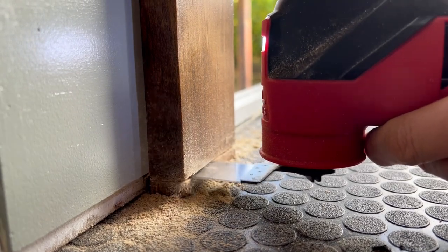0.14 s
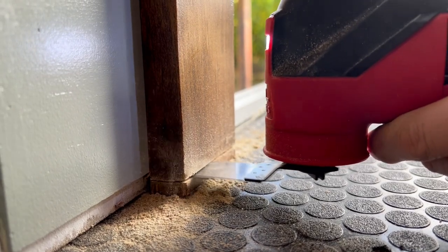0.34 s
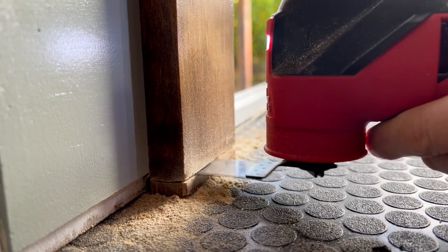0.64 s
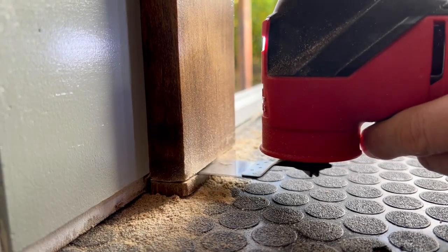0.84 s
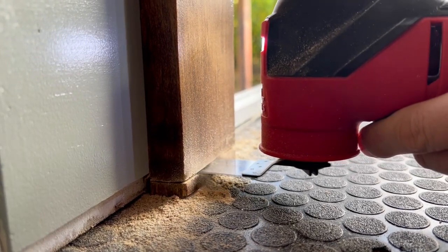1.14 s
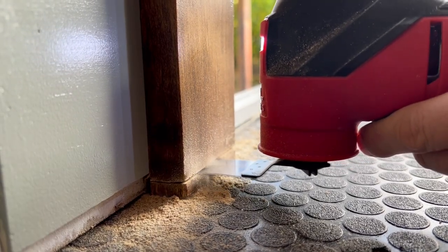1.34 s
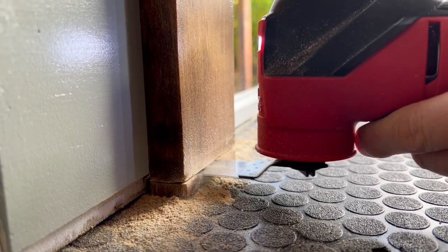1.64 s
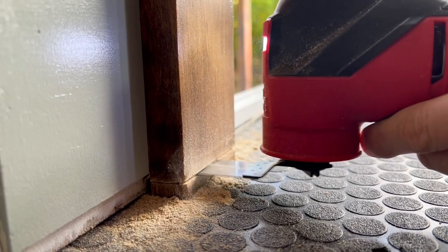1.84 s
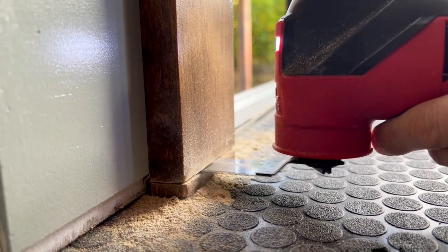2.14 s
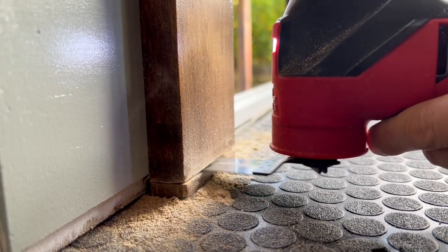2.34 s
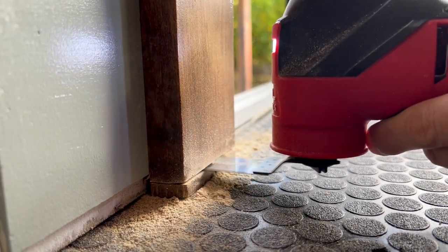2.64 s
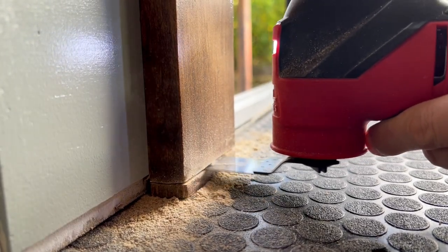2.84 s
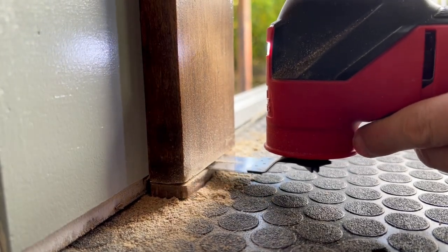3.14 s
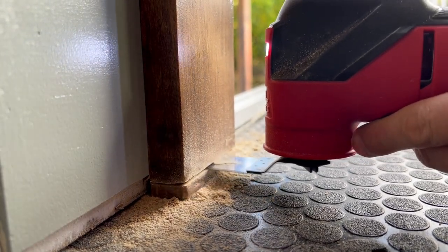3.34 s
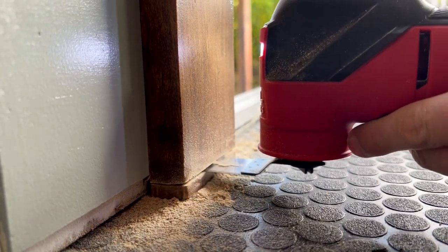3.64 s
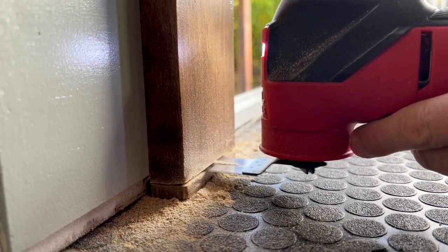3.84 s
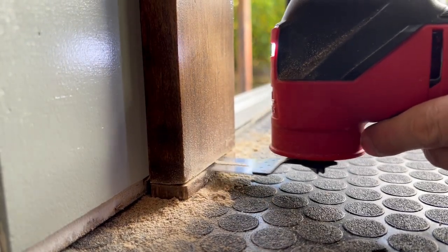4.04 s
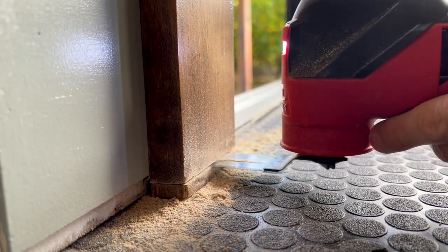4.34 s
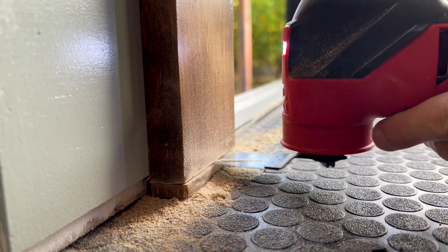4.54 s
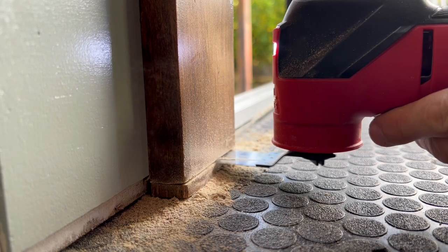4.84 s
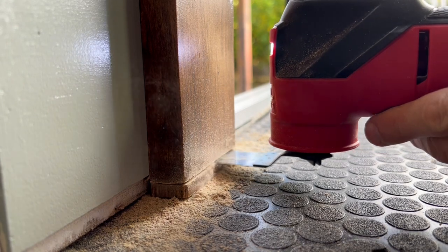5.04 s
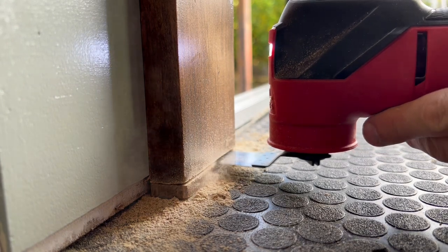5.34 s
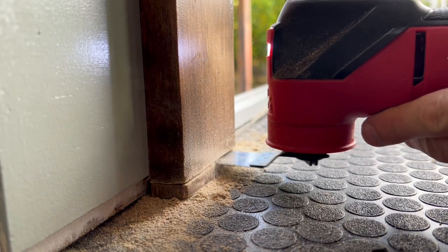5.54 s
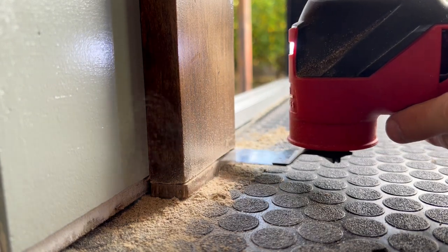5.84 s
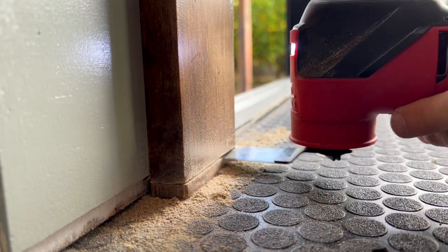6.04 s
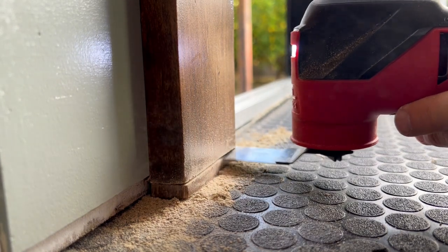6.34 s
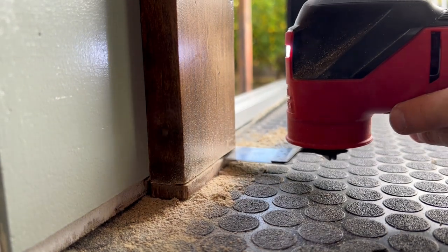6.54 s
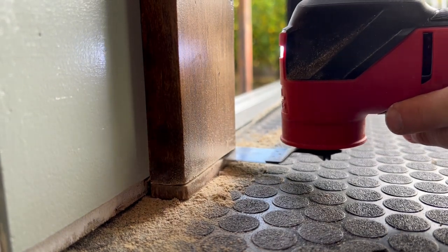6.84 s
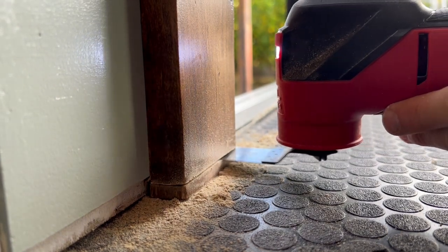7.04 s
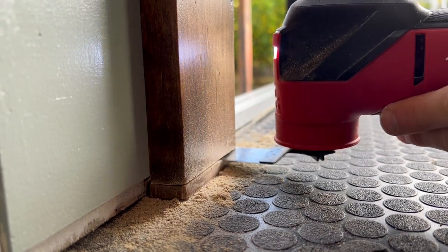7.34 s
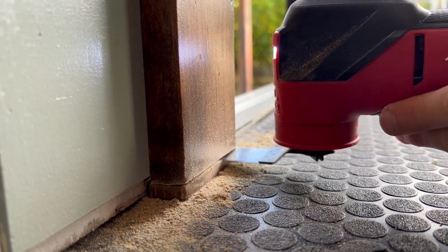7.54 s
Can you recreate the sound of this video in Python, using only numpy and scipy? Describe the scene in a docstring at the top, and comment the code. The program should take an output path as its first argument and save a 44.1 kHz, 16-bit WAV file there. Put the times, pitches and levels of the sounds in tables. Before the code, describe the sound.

An oscillating multi-tool buzzes harshly up close, its blade skimming with a metallic rattle, then growling louder as it bites into a wooden door jamb.

```python
"""Beside a wooden door jamb, near the floor: an oscillating multi-tool undercuts the wood, a hand's length away.
The blade swings 275 times a second: skimming, it rattles and rings; in long pushes and brief bites the jamb buzzes.
The swing is a sum of trembling partials; single partials of blade, shell and hum swell or fade for a while.
Filtered noise bursts rasp on both strokes, noise-driven resonances ring the plate and clamp,
and now and then the blade chatters in the slot; faint dull noise lies behind."""
import sys
import numpy as np
from scipy import signal
from scipy.fft import rfft, irfft
from scipy.io import wavfile
from scipy.ndimage import uniform_filter1d

SR = 44100
rng = np.random.default_rng(int(sys.argv[2]) if len(sys.argv) > 2 else 0)


def wav_out(sig):
    """Save sig, one row per channel (or a flat mono array), as 16-bit PCM at SR to the path in sys.argv[1]."""
    wavfile.write(sys.argv[1], SR, np.round(np.clip(np.atleast_2d(sig).T, -1, 1) * 32767).astype(np.int16))


N = 338672
TIME_S = np.arange(N) / SR
BINS_HZ = np.fft.rfftfreq(N, 1 / SR)
SWING_HZ = 275.3

# partials 1, 2, 3 .. of the swing, relative levels: skimming_db, gripping_db
PARTIAL_LEVELS = [(-47, -48), (-51, -39), (-48, -34.5), (-43, -35.5), (-48, -40.5), (-49.5, -43.5),
                  (-45, -47), (-51.5, -47), (-53.5, -46), (-54, -45), (-55, -46), (-49.5, -44.5),
                  (-47, -44), (-49, -46), (-55, -48), (-54, -46), (-51.5, -46), (-48, -45), (-44, -44.5),
                  (-46, -45), (-46, -46.5), (-50.5, -47.5)]
# envelope of the higher partials, relative: pitch_hz, level_db
FIZZ_ENVELOPE = [(6300, -48.5), (7700, -52.5), (9100, -52.5), (10200, -42), (11600, -33), (12900, -43),
                 (13800, -36.5), (15400, -47)]
# single partials of blade, shell and hum swell or fade for a while: start_s, end_s, pitch_hz, gain_db
PARTIAL_SWELLS = [(.1, .45, 4955, 6), (0, .3, 3579, 6), (.48, .55, 5231, 6), (.55, 1.35, 5700, -6),
                  (.13, .22, 826, 8), (.7, .87, 1101, 4), (.82, .97, 1376, 7), (.87, 1.02, 275, -3),
                  (.92, 1.02, 1927, -9), (1.04, 1.28, 275, 6), (1.05, 1.17, 3440, 10),
                  (1.12, 1.28, 1927, 7), (1.15, 1.3, 4540, 6), (1.18, 1.32, 6883, 8),
                  (1.3, 1.69, 2820, 13.5), (1.33, 1.5, 5230, 8), (1.2, 1.7, 826, 3), (1.42, 1.66, 3650, 5),
                  (1.5, 1.72, 275, 6), (1.52, 1.7, 1376, 5), (1.6, 1.7, 1927, 5), (1.35, 1.7, 2202, 5),
                  (1.42, 1.55, 1927, -7), (1.72, 1.97, 5231, 3), (3.12, 3.3, 275, -6),
                  (3.12, 3.24, 1927, -8), (3.2, 3.45, 5781, -7), (3.26, 3.45, 1927, 7.5),
                  (3.3, 3.62, 4540, 5), (3.45, 3.64, 1927, 10), (3.35, 3.63, 6057, 6), (3.4, 3.63, 6600, 5),
                  (3.42, 3.62, 3205, 11), (3.47, 3.65, 5231, 5), (3.52, 3.64, 5781, 8),
                  (3.66, 4.03, 1376, 6), (3.72, 3.84, 826, 4), (3.85, 4.05, 6057, 6), (4.3, 4.9, 1101, 3),
                  (4.95, 5.13, 826, -7), (4.97, 5.42, 3420, 4.5), (5, 5.15, 5231, 4), (5.1, 5.42, 1101, 4),
                  (5.15, 5.35, 826, 4), (5.12, 5.3, 1652, 4), (5.0, 5.42, 2753, 5), (5.22, 5.46, 2265, 12),
                  (5.39, 5.46, 5231, 5), (5.3, 5.42, 275, -4), (6.15, 6.42, 3660, 7),
                  (6.45, 6.72, 5231, 2.5), (6.6, 6.87, 3680, 9), (6.7, 7.05, 1376, 4),
                  (6.75, 7.25, 2753, 6.5), (6.85, 7.02, 3854, 8.5), (6.9, 7.75, 3028, 4),
                  (7.05, 7.6, 6057, 4), (7.1, 7.75, 1652, 8.5), (7.1, 7.75, 1230, 6.5),
                  (7.15, 7.75, 2478, 6), (7.15, 7.75, 4130, 6), (7.3, 7.75, 4780, 7),
                  (7.42, 7.75, 3854, -5)]
# the hand's feed between bites: time_s, pressure (0-1)
HAND_FEED = [(0, 0.4), (.42, 0), (.78, 0.66), (1.97, 0.4), (2.22, 0.25), (2.5, 0.44), (2.8, 0.47),
             (3.1, 0.66), (3.75, 0.66), (4.0, 0.84), (4.25, 0), (4.95, 1), (5.65, 1), (5.95, 0.61),
             (6.5, 0.9), (6.8, 1)]
# the teeth bite: start_s, rise_s, length_s, boom_db, buzz_db, bark_db, fizz_db
TOOTH_BITES = [(0.113, 0.026, 0.13, -71, -43, -45.5, -36), (0.254, 0.043, 0.33, -77, -66, -50, -38.5),
               (0.572, 0.066, 0.11, -48.5, -62, -61, -42), (0.796, 0.46, 0.9, -27, -29.7, -37.5, -38.5),
               (1.848, 0.038, 0.23, -65, -56, -45, -39), (2.26, 0.055, 0.1, -44.5, -61, -64, -50),
               (2.496, 0.024, 0.049, -49, -36, -53, -44), (2.833, 0.088, 0.081, -49, -45.5, -63, -48),
               (3.048, 0.4, 0.6, -36, -30.5, -39, -37), (3.747, 0.023, 0.044, -46, -42, -61, -36),
               (4.047, 0.077, 0.86, -48, -50, -46, -60), (4.905, 0.44, 0.48, -40.5, -38.5, -33.5, -36.5),
               (5.348, 0.078, 0.097, -66, -57, -39, -32), (5.6, 0.039, 0.085, -67, -58, -58, -35),
               (6.08, 0.03, 0.14, -71, -67, -41, -39), (6.296, 0.03, 0.12, -64, -63, -41, -38),
               (6.71, 0.81, 1.26, -46, -39.5, -42.5, -32.5), (6.978, 0.057, 0.11, -50, -38, -39.5, -31)]
# answer of each part of the cut to the hand: touch_db (lightest touch), feed_db (gain at full feed),
# deep_db (gain deep in the slot), wander_db (unsteadiness), share (of a bite's rise needed),
# power (steepness of that rise), sag_db_per_s (once the teeth are in)
BOOM_EFFORT = dict(touch_db=-59.5, feed_db=8.5, deep_db=5, wander_db=2.5, share=0.67, power=1, sag_db_per_s=7)
BUZZ_EFFORT = dict(touch_db=-49.5, feed_db=11.5, deep_db=-6, wander_db=2.8, share=0.86, power=0.74, sag_db_per_s=7)
BARK_EFFORT = dict(touch_db=-50, feed_db=10, deep_db=1.5, wander_db=2.5, share=0.97, power=1.6, sag_db_per_s=12)
FIZZ_EFFORT = dict(touch_db=-43, feed_db=4.5, deep_db=2, wander_db=0.2, share=0.97, power=2.6, sag_db_per_s=7)
# hum of the freely swinging housing: time_s, level_db
HOUSING_HUM = [(0, -46.6), (4.3, -47.6), (5.7, -43.6), (6.35, -42.2), (6.58, -44.5), (6.85, -38.5),
               (7.15, -37.3), (7.68, -42.8)]
# extra rattle and tearing over an even cut: time_s, gain_db
RATTLE_GAIN = [(0, 7.5), (.35, 1.5), (.6, 8.5), (.85, 7), (1.55, 15), (1.72, 12), (2.0, 5.5), (2.35, 4.5),
               (2.5, 8), (2.8, 5), (3.05, 6), (3.55, 16.5), (3.75, 9), (3.93, 4), (4.15, 8), (4.6, 6.5),
               (5.4, 14.5), (5.62, 11), (6.05, 4), (6.25, 3.5), (6.6, 0), (7.0, 13)]
# rasp spectra of tearing fibres, slot and steel plate: pitch_hz, density_db (per Hz, relative)
WOOD_SPECTRUM = [(200, -17.5), (380, -15), (550, 4), (1100, 0), (1450, 0.5), (1900, 7), (2150, 4),
                 (2330, 2)]
SLOT_SPECTRUM = [(2400, -16), (2600, -5), (2900, -16), (3150, -11), (3500, -1), (3900, -4), (4250, -9),
                 (4600, -2), (5200, -8), (5600, -40)]
STEEL_SPECTRUM = [(3500, -9), (4700, -4.5), (5250, 5.5), (5950, -2), (6600, -3.5), (8000, -4.5),
                  (9000, -1.5), (11500, -67), (12600, 4), (13600, -23), (15400, -2)]
# own pitches of the steel plate, and of the clamp and housing: pitch_hz, width_hz, level_db (relative)
PLATE_MODES = [(5236, 19, 12), (5520, 40, -24), (5410, 25, 10), (5370, 40, -13), (5660, 50, 1)]
CLAMP_MODES = [(1138, 20, 4.5), (1240, 14, -8.5), (2040, 30, -22), (3334, 25, 8.5), (3575, 22, 2.5),
               (3970, 55, -4)]
# the blade jumps in the slot: centre_s, length_s, knock_db, scratch_db
CHATTER_EVENTS = [(.17, 0.053, -69, -61), (0.622, 0.028, -55, -40.5), (1.7, 0.02, -36.5, -50),
                  (1.795, 0.041, -32, -30), (1.891, 0.02, -45, -49), (2.53, 0.022, -44, -55),
                  (2.623, .03, -54, -52), (2.76, .03, -59, -46), (2.907, 0.011, -37, -56),
                  (3.675, 0.048, -48, -54), (3.776, 0.027, -45, -43), (5.489, 0.017, -36, -52),
                  (5.513, 0.029, -27, -28.5), (5.542, 0.043, -32.5, -32), (5.685, 0.03, -39, -44),
                  (5.85, 0.013, -43, -54), (5.898, 0.022, -48, -55), (6.041, 0.038, -42, -54)]
# jamb resonances under the knocks: pitch_hz, width_hz, level_db (relative)
JAMB_MODES = [(218, 260, -10), (520, 51, -1), (1130, 63, 6.5), (1660, 99, 4.5), (2680, 380, 3)]
# spectra of the chatter's scratch and the background: pitch_hz, density_db (per Hz, relative)
SCRATCH_SPECTRUM = [(300, -29), (1000, -43), (2500, -1), (4000, 8), (5500, 5.5), (7500, -4.5), (12500, 1),
                    (15500, -2)]
ROOM_SPECTRUM = [(25, -14), (55, -7), (120, -6), (200, -8), (400, -9), (1500, -31)]
# phase lead of the left microphone port over the right: pitch_hz, lead_rad
PORT_LEAD = [(0, 0), (2250, 0), (2500, 1.3), (3350, 1.5), (3750, 0), (4600, 0), (5000, 1.7), (5250, 1.7),
             (5500, 1.9), (5780, 2.6), (6200, 0), (7300, 0), (10000, -3.14), (13400, -6.28), (16000, -8.7)]

SINK_S = (3.6, 8.4)  # the blade sinks into the slot
SEATED_S = (5.9, 7.4)  # the slot walls take hold of the blade and steady it
GRIP_DB = -34.5  # load at half grip
RELEASE_S = 0.009  # decay when the teeth let go
HELD_DB, HELD_DROP_DB = -41.5, 7.5  # boom at which the wood holds the tool; drop of the hum
KICK_DB, KICK_S = 3.5, 0.14  # the freed tool shakes harder for a moment
WOOD_DB, WOOD_DAMP_DB = -57, 11  # fibre rasp in an even cut; a firm grip tears more evenly
STEEL_DB, STEEL_DAMP_DB = -45, 3  # plate rasp at the lightest touch; damping by a firm grip
STEEL_FOLLOW, STEEL_RATTLE = 0.63, 0.26  # dB of plate rasp per dB of fizz, per dB of rattle
FLURRY_MAX_DB = 5
PLATE_DB, PLATE_DEEP_DB = -1.64, 2  # gain of the plate's partials; extra deep in the slot
PLATE_RING_DB, CLAMP_RING_DB = -52, -54  # in an even cut
RING_GRIP_DB, RING_DEEP_DB = 5, 4.5  # a firm grip and a deep cut raise both rings
TOP_HZ = 15750


def jamb(turns, grip, boom_db, buzz_db):
    """The teeth drag the wood to and fro: a boom at two pushes a swing, a buzz of partials 3-5 above it."""
    boom = partials(turns, grip, orders=np.arange(2, 3), loose=0.39, firm=0.044, apart=0.21,
                    sway_db=1.0, db=boom_db)
    buzz = partials(turns, grip, orders=np.arange(3, 6), loose=0.42, firm=0.02, apart=0.6,
                    sway_db=0.9, db=buzz_db)
    return pan(boom, db=5.0) + pan(buzz, db=-3.0)


def blade(turns, grip, bark_db, fizz_db, flutter_db=2.0):
    """Teeth bark on the slot's end, the plate rings at 5-6 kHz.
    In a firm cut the edge steadies in pitch; edge and top grow louder."""
    edge_db = fizz_db - 11.0 + 3.0 * grip
    top_db = fizz_db - 11.0 + 4.6 * grip
    bark = partials(turns, grip, orders=np.r_[6, 8:18], loose=0.42, firm=0.04, apart=0.65,
                    sway_db=3.5, db=bark_db)
    plate = partials(turns, grip, orders=np.arange(18, 23), loose=0.65, firm=0.14, apart=0.4,
                     sway_db=2.5, memory_hz=12)
    edge = partials(turns, grip, orders=np.arange(23, 34), loose=0.28, firm=0.06, apart=0.4,
                    sway_db=4.5, db=edge_db)
    top = partials(turns, grip, orders=np.arange(34, 58), loose=1.0, firm=1.0, apart=0.017,
                   sway_db=5.5, db=top_db, memory_hz=25.1)
    # a loose blade bounces in the slot: flurries
    flutter = undb(flutter_db * (1.0 - 0.14 * grip) * walk(44))
    plate_gain = undb(PLATE_DB + PLATE_DEEP_DB * depth())
    return pan(bark, db=-2.0) + edge + (plate_gain * plate + top) * flutter


def housing(turns, grip, hum_db):
    """The body shakes at the swing rate; its shell sings at the seventh partial."""
    hum = partials(turns, grip, orders=np.arange(1, 2), loose=0.06, firm=0.06, apart=0.12,
                   sway_db=0.4, db=hum_db)
    shell = partials(turns, grip, orders=np.arange(7, 8), loose=0.25, firm=0.12, apart=0.4, sway_db=1.5)
    return pan(hum, db=-2.5) + pan(shell * undb(-1.0), db=-5.5)


def partials(turns, grip, orders, loose, firm, apart, sway_db, db=None, memory_hz=6, sway_rate_hz=14):
    """Sum partials of the swing, each with its own tremble (loose to firm), flicker and swells.
    db, if given, sets their joint level before flicker and swells."""
    out, power = np.zeros((2, N)), 0
    waver = (loose + (firm - loose) * grip).astype(np.float32)
    for order in orders:
        hz = order * SWING_HZ
        if order <= len(PARTIAL_LEVELS):
            low_db, high_db = PARTIAL_LEVELS[order - 1]
        else:
            low_db = high_db = np.interp(hz, *np.transpose(FIZZ_ENVELOPE))
        plain_db = low_db + (high_db - low_db) * grip
        size = undb(plain_db + swell_db(hz) + sway_db * np.tanh(walk(sway_rate_hz)))
        cycles = (order * turns + rng.random()) % 1
        angle = (2 * np.pi * cycles + 0.74 * walk(3.07)).astype(np.float32)
        # wall and floor reflections shift as the hand moves, differently at each port
        angle = angle + (apart * walk(3.5)).astype(np.float32) * np.float32([[1], [-1]])
        along = waver * tremble(memory_hz, 2 * apart)
        across = waver * tremble(memory_hz, 2 * apart)
        wave = (1 + along) * np.sin(angle) + across * np.cos(angle)
        out += size / np.sqrt(1 + 2 * waver ** 2) * wave
        power = power + undb(2 * plain_db)
    joint_gain = 1 if db is None else undb(db) / np.sqrt(power)
    return out * np.sqrt(2) * joint_gain


def swell_db(hz, width_hz=190, ease_s=0.04):
    """Gain in dB by which one partial swells or fades for a while, shared with close neighbours."""
    gain_db = 0
    for start_s, end_s, centre_hz, db in PARTIAL_SWELLS:
        if abs(hz - centre_hz) < SWING_HZ:
            inside_s = np.minimum(TIME_S - start_s, end_s - TIME_S)
            fade = np.clip(inside_s / ease_s + 0.5, 0, 1)
            gain_db = gain_db + db * np.exp(-((hz - centre_hz) / width_hz) ** 2) * fade
    return gain_db


def tremble(memory_hz, apart):
    """Chance renewed each swing with memory of the last few, partly different per port; spread near 1."""
    count = int(N / SR * SWING_HZ) + 3
    kicks = rng.standard_normal(count) + apart * rng.standard_normal((2, count))
    slow = signal.lfilter([1], [1, -np.exp(-2 * np.pi * memory_hz / SWING_HZ)], kicks)
    knots = unit(signal.resample_poly(slow, 8, 1, axis=1))
    return np.array([np.interp(TIME_S * SWING_HZ * 8, np.arange(len(k)), k) for k in knots], np.float32)


def effort(bite_db, touch_db, feed_db, deep_db, wander_db, share, power, sag_db_per_s):
    """Level in dB of one part of the cut: skimming that follows feed and depth, plus bite energy."""
    feed, = curves(HAND_FEED)
    skim_db = touch_db + feed_db * feed + deep_db * depth() + wander_db * walk(12)
    energy = undb(skim_db) ** 2
    for (start_s, rise_s, length_s, *_), db in zip(TOOTH_BITES, bite_db):
        sag_db = sag_db_per_s * np.maximum(TIME_S - start_s - share * rise_s, 0)
        envelope = bite(start_s, share * rise_s, length_s, power)
        energy = energy + (undb(db - sag_db) * envelope) ** 2
    return 10 * np.log10(energy)


def bite(start_s, rise_s, length_s, power):
    """Envelope of one bite: builds as the hand leans in, holds, lets go quickly."""
    age_s = TIME_S - start_s
    return np.clip(age_s / rise_s, 0, 1) ** power * np.exp(-np.maximum(age_s - length_s, 0) / RELEASE_S)


def shaking(boom_db):
    """Hum level in dB: a firm bite steadies the housing; it kicks when the blade comes free."""
    held = uniform_filter1d(1 / (1 + undb(HELD_DB - boom_db) ** 8), size=int(0.07 * SR))
    freed = np.maximum(np.interp(TIME_S - KICK_S, TIME_S, held) - held, 0)
    return curves(HOUSING_HUM)[0] - HELD_DROP_DB * held + KICK_DB * freed


def depth():
    """Depth of the blade in the slot: 0 shallow, 1 at the end of SINK_S."""
    return np.interp(TIME_S, SINK_S, (0, 1))


def rasp(turns, wood_db, steel_db, sharp=0.3, scatter_db=3.5, back_db=1.5, slot_db=1.0, slot_deep_db=9.5):
    """Fibres tear in a noise burst on each stroke, stronger on the second, no two alike."""
    burst = np.exp(sharp * np.sin(2 * np.pi * turns) ** 2)
    burst *= undb(scatter_db * np.tanh(per_stroke(2 * turns)) + back_db * (turns % 1 > 0.5))
    wood = tearing(burst, WOOD_SPECTRUM, apart=0.7, flicker_db=1.5, grit_db=1)
    slot = tearing(burst, SLOT_SPECTRUM, apart=1, flicker_db=1.7, grit_db=1)
    steel = tearing(burst, STEEL_SPECTRUM, apart=0.45, flicker_db=1.5, grit_db=3)
    slot_gain = undb(slot_db + slot_deep_db * depth())  # relative to the wood
    return (wood + slot * slot_gain) * undb(wood_db) + steel * undb(steel_db)


def tearing(burst, spectrum, apart, flicker_db, grit_db):
    """Burst noise broken into flurries and single grains; rms 1."""
    flurry_db = FLURRY_MAX_DB * np.tanh(flicker_db * walk(55) / FLURRY_MAX_DB)
    return colour(noise(apart) * burst * undb(flurry_db + grit_db * walk(3000)), spectrum)


def ringing(turns, grip, flurry_db=5.5):
    """The scraping teeth keep plate and clamp ringing at their own pitches, in flurries."""
    burst = np.exp(np.sin(2 * np.pi * turns) ** 2)
    plate = ring(noise(apart=0.2) * burst * undb(flurry_db * walk(25)), PLATE_MODES)
    clamp = ring(noise(apart=0.62) * burst * undb(flurry_db * walk(25)), CLAMP_MODES)
    drive = undb(RING_DEEP_DB * depth() + RING_GRIP_DB * grip)
    return (plate * undb(PLATE_RING_DB) + clamp * undb(CLAMP_RING_DB)) * drive


def chatter(turns, slip=0.15, contact_hz=2200, grit_db=3):
    """The blade jumps: about three uneven knocks a swing on either side of the jamb, with a grainy scratch."""
    knock_gain, scratch_gain = 0, 0
    for centre_s, length_s, knock_db, scratch_db in CHATTER_EVENTS:
        swell = np.exp(-np.minimum(abs(2 * (TIME_S - centre_s) / length_s), 4) ** 3)
        knock_gain = knock_gain + undb(knock_db) * swell
        scratch_gain = scratch_gain + undb(scratch_db) * swell
    force = undb(2 * np.tanh(per_stroke(3 * turns)))
    side = np.sign(per_stroke(3 * turns))
    contacts = np.diff(np.floor(3 * (turns + slip * walk(120))), prepend=0)
    # soft wood blunts each knock
    blunt = signal.butter(2, (260, contact_hz), "bandpass", fs=SR, output="sos")
    knocks = signal.sosfilt(blunt, contacts * force * side)
    grains = undb(grit_db * np.tanh(walk(900)))
    scratch = colour(noise(apart=0.1) * force * grains, SCRATCH_SPECTRUM)
    return ring(knocks, JAMB_MODES) * knock_gain + scratch * scratch_gain


def room():
    """Faint low-weighted background noise with a slowly wandering level."""
    return undb(-71.0) * colour(noise(apart=0.14) * undb(walk(3.4)), ROOM_SPECTRUM)


def undb(db):
    """Decibels to gain."""
    return np.exp(np.asarray(db) * (np.log(10) / 20))


def unit(x):
    """Scale to rms 1."""
    return x / np.sqrt(np.mean(x ** 2))


def curves(table):
    """Each column of a table, joined by straight lines in time."""
    time_s, *columns = np.transpose(table)
    return [np.interp(TIME_S, time_s, c) for c in columns]


def walk(rate_hz):
    """Smooth chance, spread near 1, changing about rate_hz times a second."""
    knots = signal.resample_poly(rng.standard_normal(int(N / SR * rate_hz) + 3), 8, 1)
    return np.interp(TIME_S * rate_hz * 8, np.arange(len(knots)), knots)


def per_stroke(turns):
    """One random value held for each whole unit of turns."""
    return rng.standard_normal(N // 50)[turns.astype(int)]


def noise(apart):
    """Two channels of noise: a common part, and reflections that differ at each port."""
    return rng.standard_normal(N) + apart * rng.standard_normal((2, N))


def colour(x, points):
    """Filter by a (pitch_hz, density_db) spectrum, rolled off beyond its ends; rms 1."""
    hz, db = np.transpose(points)
    gain = undb(np.interp(np.log(BINS_HZ + 1), np.log(hz), db))
    gain /= np.hypot(1, (BINS_HZ / hz[-1] / 1.3) ** 4)
    gain /= np.hypot(1, (hz[0] / 1.3 / (BINS_HZ + 1)) ** 4)
    return unit(irfft(rfft(x) * gain, N))


def ring(x, modes):
    """Pass through parallel (pitch_hz, width_hz, level_db) resonances; rms 1."""
    response = 0
    for hz, width_hz, db in modes:
        damping = 1j * BINS_HZ * width_hz
        response = response + undb(db) * damping / (hz ** 2 - BINS_HZ ** 2 + damping)
    return unit(irfft(rfft(x) * response, N))


def pan(x, db):
    """Set left minus right gain in dB."""
    return x * undb(np.array([[db], [-db]]) / 2)


def scene():
    """All layers but the room follow one swing with a little play; the louder the wood, the firmer the grip."""
    turns = np.cumsum(SWING_HZ + 0.211 * walk(12) + 0.46 * walk(90)) / SR
    _, _, _, booms_db, buzzes_db, barks_db, fizzes_db = np.transpose(TOOTH_BITES)
    boom_db = effort(booms_db, **BOOM_EFFORT)
    buzz_db = effort(buzzes_db, **BUZZ_EFFORT)
    bark_db = effort(barks_db, **BARK_EFFORT)
    fizz_db = effort(fizzes_db, **FIZZ_EFFORT)

    load = np.sqrt(undb(boom_db) ** 2 + undb(buzz_db) ** 2 + undb(bark_db) ** 2)
    seated = np.interp(TIME_S, SEATED_S, (0, 0.9))
    grip = np.maximum(1 / (1 + (undb(GRIP_DB) / load) ** 4), seated)

    rattle_db, = curves(RATTLE_GAIN)
    wood_db = WOOD_DB + rattle_db - WOOD_DAMP_DB * grip
    steel_db = STEEL_DB + STEEL_FOLLOW * (fizz_db - FIZZ_EFFORT["touch_db"])
    steel_db = steel_db - STEEL_DAMP_DB * grip + STEEL_RATTLE * rattle_db

    cut = jamb(turns, grip, boom_db, buzz_db) + rasp(turns, wood_db, steel_db) + chatter(turns)
    tool = blade(turns, grip, bark_db, fizz_db) + housing(turns, grip, shaking(boom_db))
    return cut + tool + ringing(turns, grip) + room()


def record(dry):
    """Two close microphone ports hear the tool out of step; the top is cut."""
    lead_rad = np.interp(BINS_HZ, *np.transpose(PORT_LEAD))
    low_pass = np.clip((TOP_HZ - BINS_HZ) / 150 + 0.5, 0, 1)
    port_shift = np.exp(0.5j * lead_rad * np.array([[1], [-1]]))
    return irfft(rfft(dry) * low_pass * port_shift, N)


dry = scene()
out = record(dry)
wav_out(out)
```